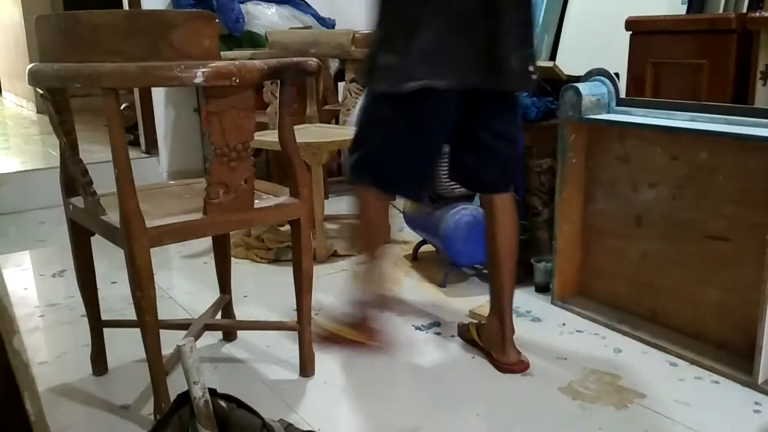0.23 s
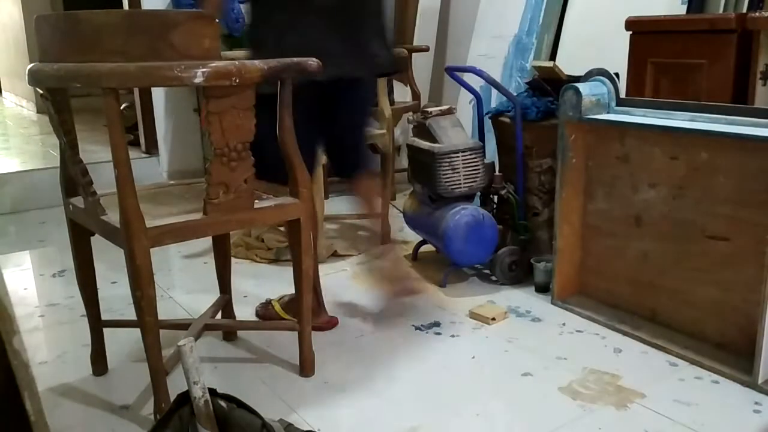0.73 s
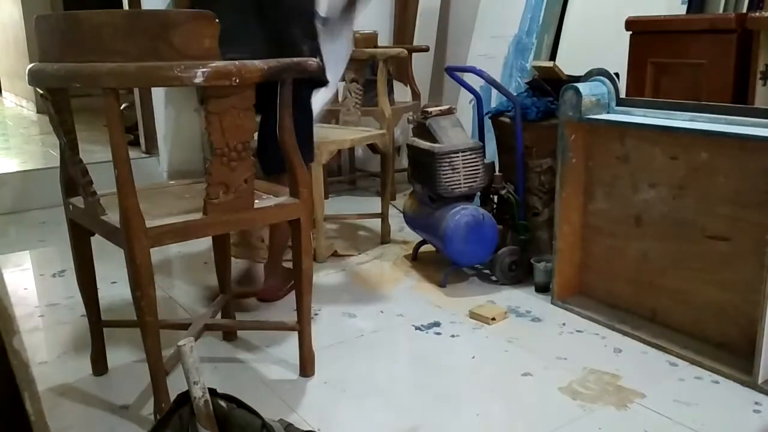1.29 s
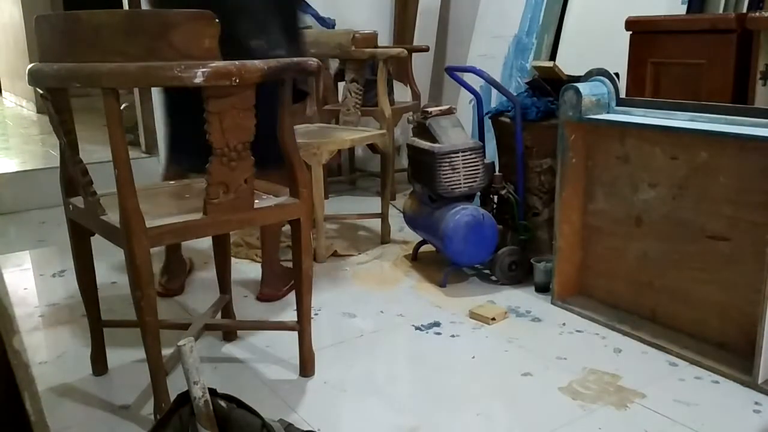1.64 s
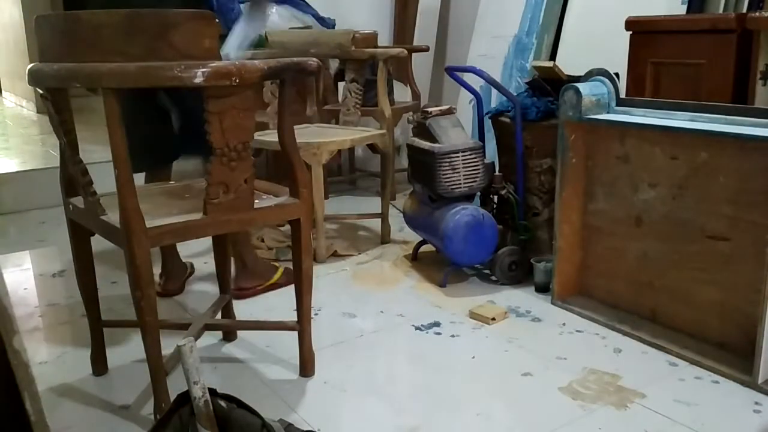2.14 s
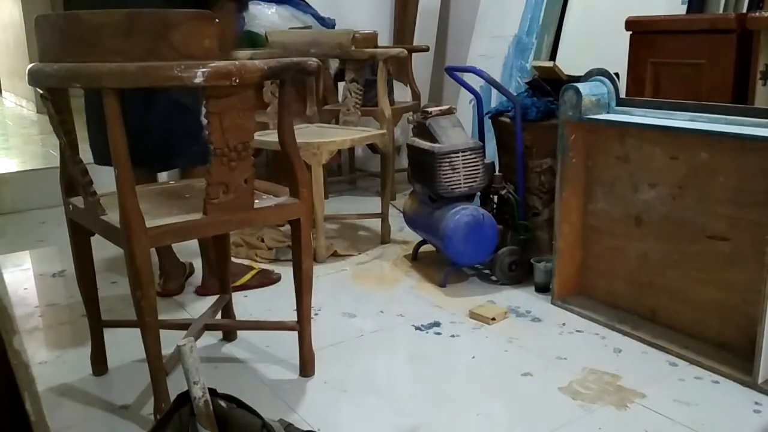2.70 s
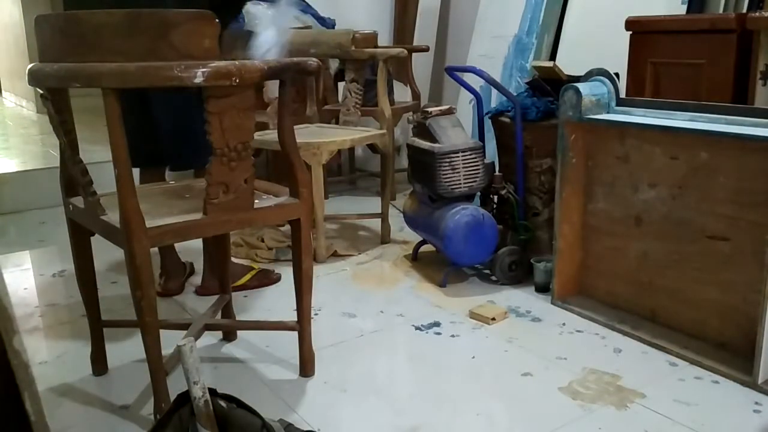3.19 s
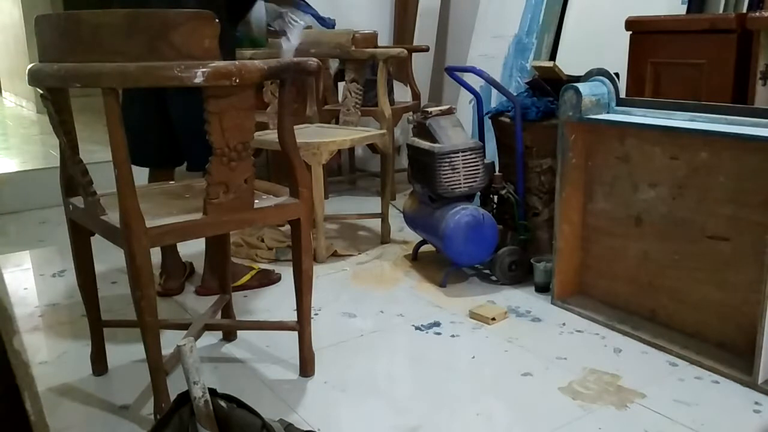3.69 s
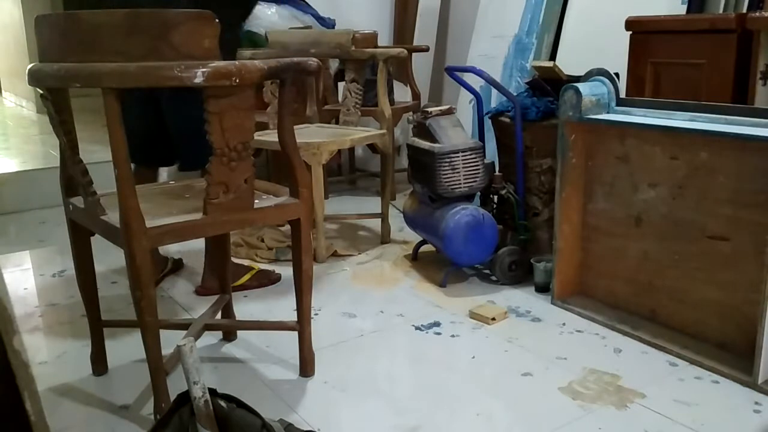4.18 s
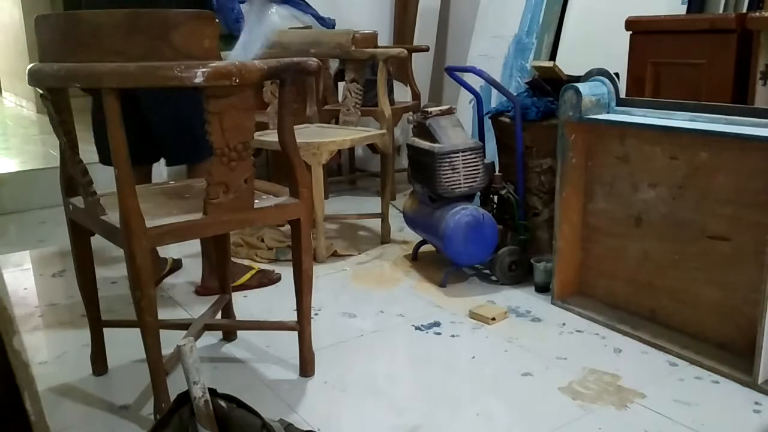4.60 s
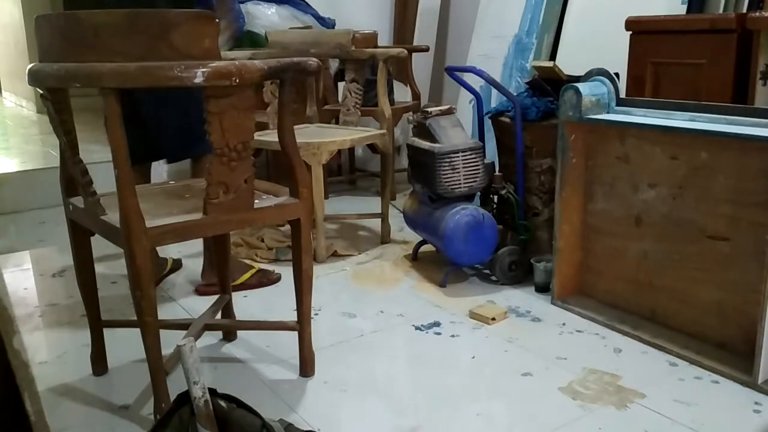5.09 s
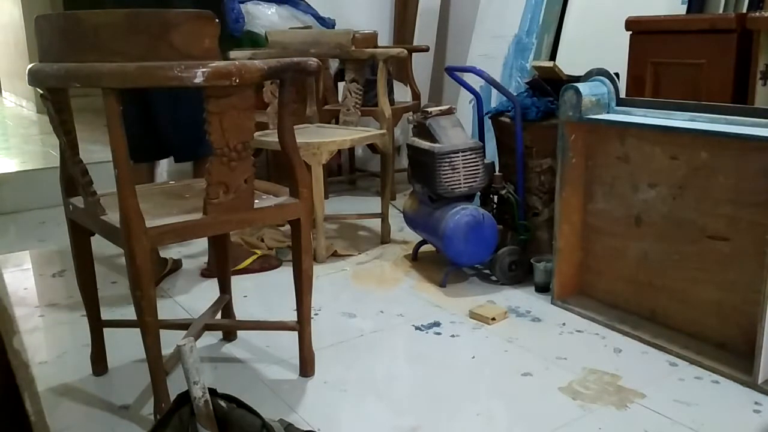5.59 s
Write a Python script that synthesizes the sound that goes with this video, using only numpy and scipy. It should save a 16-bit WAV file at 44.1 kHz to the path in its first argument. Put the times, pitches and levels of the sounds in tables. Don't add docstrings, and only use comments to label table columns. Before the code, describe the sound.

Gritty sole scuffs and tiny clicks open the scene, then three hollow flip-flop slaps, the first loudest, ring through a hard room full of wooden furniture. The walker nearly stops; only hush and a faint far motorbike remain. Then a softer slap, a quick sharp one and a dull full one. Fixed stereo microphone a few metres off, treble slightly watery from noise suppression.

```python
import sys
import numpy as np
from scipy import signal
from scipy.fft import rfft, irfft, next_fast_len
from scipy.io import wavfile
from scipy.ndimage import uniform_filter1d

SR = 44100
rng = np.random.default_rng(int(sys.argv[2]) if len(sys.argv) > 2 else 0)


def transcribe(u):
    v = np.clip(np.atleast_2d(u).T, -1, 1)
    q = np.round(v * 32767).astype(np.int16)
    wavfile.write(sys.argv[1], SR, q)


def to_linear_factor(level_db):
    exponent = np.asarray(level_db, float) / 20
    return 10 ** exponent


N = 257334

# f/Hz, level/dB
HUSH_TONE = [(12, -32), (20, -2), (128, -3.5), (652, -18), (1020, -29.5), (3720, -39.5), (4530, -45),
             (8170, -41.5), (11100, -34), (13000, -49.5), (13800, -82.5)]
# f/Hz, likeness/0-1
LIKENESS = [(50, .999), (125, .993), (250, .93), (500, .58), (1000, .03), (3000, .1), (12000, .1)]
# f/Hz, left minus right/dB
PORT_TILT = [(200, .5), (2000, 0), (4000, 1.95), (8000, -6), (12000, -4)]
# t/s, firing tone f/Hz, level/dB, third partial strength/0-1
BIKE_RIDE = [(2.85, 140, -103, 0), (3.01, 133, -74.5, 0.05), (3.189, 147.7, -66, 0),
             (3.24, 179.7, -68, 0.28), (3.451, 193.8, -68, 0.62), (3.58, 204, -70.5, .3),
             (3.67, 205.3, -72.5, 1.06), (3.76, 207, -70, 0.14), (4.08, 226, -74, 0.47),
             (4.14, 220.4, -72, 0.1), (4.172, 202.3, -59.5, 0.64), (4.28, 198.4, -63, 0.88),
             (4.7, 198, -64, 0.25), (4.885, 199, -64.5, 0.75), (5.239, 193, -73.5, .4),
             (5.35, 188, -57, 0.23), (5.5, 187.5, -71.5, 0.12), (5.579, 190, -57, 0.57)]
# f/Hz, width/Hz, level/dB
TANK_MODES = [
    (516, 60, -7),
    (765, 64, 0.5),
    (1032, 44, 1.5),
]
# peak t/s, rise/s, fall/s, second mode level/dB, third mode level/dB
TANK_SWELLS = [(.466, 0.13, 0.15, -77, -68.5), (.7, 0.041, 0.083, -69, -79), (.88, 0.043, 0.038, -94, -71),
               (1.38, 0.43, 0.15, -67, -63), (1.62, 0.066, 0.066, -62.5, -72),
               (2.0, 0.21, 0.16, -55, -54.5), (2.15, 0.26, 0.078, -56, -59),
               (2.43, 0.063, 0.51, -69.5, -69), (3.1, 0.045, 0.087, -68, -89),
               (3.15, 0.13, 0.14, -81, -68.5), (3.41, 0.11, 0.2, -72, -75.5),
               (3.54, 0.19, 0.084, -70.5, -88)]
# t/s, length/s, f/Hz, width/Hz, level/dB
NOISE_MURMURS = [(0., .11, 1950, 900, -67), (5.525, .075, 3750, 300, -82), (2.07, .15, 780, 300, -63),
                 (2.98, .45, 215, 90, -69), (.3, .35, 135, 50, -66), (1.0, .36, 150, 40, -58),
                 (1.53, .14, 800, 700, -68), (.63, .22, 900, 500, -73), (5.562, .06, 1200, 1400, -64),
                 (2.47, .11, 1035, 40, -66), (2.0, .14, 230, 120, -56), (5.2, .3, 1100, 600, -73),
                 (5.3, .2, 780, 280, -79)]
# f/Hz, level/dB per Hz
GRIT_TONE = [(1470, -51), (2500, -15), (2810, -15.5), (4740, -18), (5680, -12), (7260, -14), (11500, -3.5),
             (15500, -9), (16500, -14.5)]
# peak t/s, rise/s, fall/s, hiss level/dB, rub level/dB
SOLE_SCUFFS = [(0.0, 0.14, 0.071, -67, -74), (.225, 0.018, 0.17, -56, -71), (.26, 0.041, 0.16, -50.5, -78),
               (.36, .04, 0.22, -51, -64.5), (.46, 0.15, 0.11, -74, -66), (.545, 0.051, 0.07, -75, -65.5),
               (.878, 0.015, .2, -59, -68), (.925, 0.056, 0.034, -46.5, -49), (1.2, 0.29, 0.32, -61.5, -52),
               (1.36, 0.18, 0.14, -56, -65), (1.685, 0.023, 0.33, -56, -54.5),
               (1.752, 0.097, 0.029, -51.5, -49), (2.096, 0.22, 0.16, -59, -53),
               (2.21, 0.17, 0.12, -63.5, -67.5), (2.425, 0.066, 0.7, -64.5, -65.5),
               (2.476, 0.073, 0.071, -51.5, -62.5), (2.8, 0.18, 0.08, -55.5, -62),
               (3.164, 0.13, 0.17, -85.5, -69), (3.45, 0.1, 0.25, -85.5, -69.5),
               (3.85, 0.17, 0.13, -81.5, -92), (4.116, 0.041, 0.11, -81.5, -101),
               (4.285, 0.053, 0.028, -76.5, -61.5), (4.55, 0.087, 0.079, -74, -58),
               (4.9, 0.012, 0.034, -47.5, -44.5), (5.468, 0.047, 0.089, -65, -75),
               (5.595, 0.047, 0.023, -70.5, -65)]
# peak t/s, rise/s, fall/s, thud level/dB, floor rumble level/dB
FOOT_PRESSES = [(.226, 0.044, 0.058, -65, -68), (.44, 0.23, 0.034, -71, -76),
                (.925, 0.049, 0.036, -42, -34), (1.2, 0.1, 0.14, -45.5, -73),
                (1.4, 0.088, 0.05, -75, -61.5), (1.63, 0.056, 0.18, -66, -76),
                (1.752, 0.054, 0.051, -38.5, -29.5), (1.93, 0.14, 0.05, -59, -32.5),
                (2.08, 0.46, 0.061, -54.5, -61.5), (2.42, 0.2, 0.21, -73, -83),
                (2.565, 0.069, 0.073, -59.5, -44.5), (3.1, 0.11, 0.13, -77, -74),
                (3.43, 0.11, 0.33, -68, -75.5), (4.2, 0.17, 0.11, -72.5, -80),
                (4.285, 0.046, .03, -56, -50.5), (4.55, 0.12, 0.14, -64.5, -47.5),
                (4.9, 0.033, 0.051, -46, -34), (5.2, 0.12, 0.16, -76.5, -56), (5.35, 0.4, 0.5, -82, -54),
                (5.595, 0.044, .03, -57, -37.5)]
# t/s, peak level/dB, body level/dB, decay/s
GRIT_TICKS = [(.203, -51, -13, .003), (0.2475, -31, -40, 0.013), (0.251, -34, -42, 0.00033),
              (0.342, -29.5, -13, 0.00027), (.3525, -33, -30, 0.00075), (0.542, -38, -46, 0.0022),
              (0.543, -47, -40, .001), (0.938, -25, -12, 0.0035), (1.765, -36, -13, .005),
              (4.887, -41, 8.5, 0.0018), (5.579, -64, 10.5, 0.0047), (5.604, -31, -25, 0.00066),
              (5.624, -23, -5, 0.0026)]
# t/s, peak level/dB, f/Hz
AIR_PUFFS = [(0.9366, -22.5, 200), (.9488, -22, 600), (.9522, -19, 795), (.9578, -19, 600),
             (0.9714, -20, 453), (0.978, -27, 350), (1.7631, -22, 120), (1.7671, -18.5, 330),
             (1.7834, -22, 304), (2.581, -21.5, 250), (2.609, -21, 399.7), (4.2951, -30, 705),
             (4.3069, -21, 130), (4.3201, -30, 297.5), (4.8894, -46, 502), (4.9097, -23.5, 296),
             (4.9108, -32, 900), (5.605, -14.5, 392), (5.6063, -17.5, 905), (5.6208, -22, 400),
             (5.6324, -17.5, 348)]
# t/s, peak level/dB, treble level/dB, contact/s, body level/dB
SOLE_SLAPS = [
    (.929, -13, -8.5, 0.015, -0.5),
    (1.757, -19, -8.5, 0.0055, 0.5),
    (2.577, -17, -5, 0.0063, -1),
    (4.295, -23, -6, 0.0075, -4),
    (4.908, -19.5, -9.5, 0.0033, 0.5),
    (5.604, -17.5, -10.5, 0.0083, 3),
]
# f/Hz, level/dB
SLAP_TONE = [(25, -6), (58, -1.5), (150, -6.5), (240, -6), (500, -9), (700, -9), (1100, -13.5), (2150, -19),
             (2900, -28), (4000, -34.5), (5200, -40), (8000, -37.5), (10600, -29), (15300, -35),
             (16500, -60.5)]
# f/Hz, t60/s
ROOM_ECHO = [(60, 0.59), (250, 0.69), (1000, 0.7), (4000, 0.67), (12000, 0.43)]
# left minus right/dB, extra left lag/ms, treble echo stretch, bass echo stretch,
# crack share
SLAP_PLACES = [(.6, .2, 1.15, 0.97, 0.5), (0.9, .1, 1.08, 1.04, .1), (-0.2, .03, 1, 0.97, 0.76),
               (0.5, -.15, 1.02, 1.06, 0.86), (1.1, -.1, 0.99, 1.056, 1.35), (0.5, -.1, 1.22, 0.99, 0.74)]
# t/s, peak level/dB, f/Hz, t60/s, bass level of the slap/dB
ROOM_BOOMS = [(0.932, -15, 56.5, 0.5, -7.5), (1.753, -20, 56.2, 0.39, 0.5),
              (2.582, -34.5, 48.6, 0.34, -2.5), (4.292, -18.5, 75.6, 0.54, 2), (4.907, -29.5, 52.3, 1, 0),
              (5.597, -19.5, 61.8, 0.64, 6)]
# peak level/dB, f/Hz, t60/s, twin mode f/Hz, twin share
SEAT_RINGS = [(-12, 212, 0.48, 160, 0.15), (-24.5, 230, 0.32, 365.4, 0.79), (-19.5, 230, 0.45, 240, 0.83),
              (-31, 280, 0.42, 59, 0.46), (-32, 220, 0.54, 170, 0.53), (-26.5, 240, 0.63, 293.3, 0.67)]
PANEL_RINGS = [(-26.5, 566, 0.42, 400, 0.63), (-45, 250, 0.22, 2100, 1), (-26.5, 465, 0.46, 690, 1.1),
               (-46.5, 700, 0.39, 605, 3.4), (-32, 393.6, 0.42, 570, 0.78), (-38, 440, 1, 620, 0.7)]
FRAME_RINGS = [(-26.5, 355, 0.15, 560, 0.36), (-40, 610, 0.54, 974, .4), (-34, 1900, 0.2, 340, .8),
               (-37.5, 484, 0.52, 549, 0.7), (-33.5, 260, 0.32, 1100, 0.32), (-37, 371, 1, 640, 0.66)]
SLAT_RINGS = [(-34.5, 1001, 0.56, 2164, .7), (-39, 1480, .34, 2143, 0.96), (-37, 2100, 0.23, 1739, 0.44),
              (-37.5, 1206, 0.37, 2180, 0.5), (-36, 1136, 0.22, 2400, .6), (-47, 1100, 0.91, 2400, .5)]
HOLLOW_KNOCKS = [(-28, 1174, .25, 290, 1.5), (-31.5, 1125, 0.26, 1200, 0.77), (-18.5, 255, 0.2, 740, .5),
                 (-33, 759, 0.26, 130, 1.1), (-39, 520, 0.25, 603, 0.93), (-35.5, 673, 0.26, 160, 1.2)]


def table(rows, hz):
    f, v = np.transpose(rows)
    return np.interp(np.log(np.maximum(hz, 1)), np.log(f), v)


def unit(x):
    return x / np.sqrt(np.mean(x ** 2))


def band(x, lo_hz, hi_hz):
    return signal.sosfilt(signal.butter(3, [lo_hz, hi_hz], "band", fs=SR, output="sos"), x)


def diffuse(size, colour):
    hz = np.arange(size // 2 + 1) * SR / size
    mid, side = rfft(rng.standard_normal((2, size)))
    alike = np.clip(table(LIKENESS, hz), 0, 1)
    ports = to_linear_factor(np.outer([.5, -.5], table(PORT_TILT, hz)))
    both = np.sqrt(1 + alike) * mid + np.outer([1, -1], np.sqrt(1 - alike) * side)
    return hz, both * ports * to_linear_factor(table(colour, hz))


def diffuse_noise(colour):
    size = next_fast_len(N)
    return irfft(diffuse(size, colour)[1], size)[:, :N]


def walk(rate_hz):
    hold = int(SR / rate_hz)
    levels = np.repeat(rng.standard_normal(N // hold + 1), hold)
    return unit(uniform_filter1d(uniform_filter1d(levels, hold), hold)[:N])


def add(out, s, x):
    i = int(s * SR)
    out[:, i:i + x.shape[1]] += x[:, :N - i]


def pan(db):
    return to_linear_factor(np.array([[db], [-db]]) / 2)


def swells(rows):
    sink_db, roundness = 20, 1.2
    t = np.arange(N) / SR
    power = np.zeros((2, N))
    for s, rise_s, fall_s, *levels_db in rows:
        away = np.where(t < s, (s - t) / max(rise_s, .01), (t - s) / max(fall_s, .01))
        fade = to_linear_factor(-2 * sink_db * np.minimum(away, 5) ** roundness)
        power += np.outer(to_linear_factor(np.array(levels_db)) ** 2, fade)
    return np.sqrt(power)


def hush():
    return to_linear_factor(-69 + 1.3 * walk(8.6)) * unit(diffuse_noise(HUSH_TONE))


def bike():
    waver = 1 + 0.016 * walk(30)
    lope_hz = 11 * (1 + .2 * walk(6))
    throb = to_linear_factor(3 * walk(32) + 5 * np.sin(2 * np.pi * np.cumsum(lope_hz) / SR))
    flutter = to_linear_factor(3 * walk(22))
    s, *controls = np.transpose(BIKE_RIDE)
    hz, db, third_share = (np.interp(np.arange(N) / SR, s, c) for c in controls)
    phase = 2 * np.pi * np.cumsum(hz * waver) / SR
    first = throb * (np.sin(phase) + 0.053 * np.sin(2 * phase + np.array([[0], [1.]])))
    third_db = -24.5 + 32.5 * third_share
    third = to_linear_factor(third_db) * flutter * np.sin(3 * phase + np.array([[0], [.8]]))
    running = np.arange(N) > s[0] * SR
    return np.sqrt(2) * to_linear_factor(db) * running * (first + third)


def tank():
    modes = []
    for hz, width_hz, db in TANK_MODES:
        noise = rng.standard_normal((2, N))
        modes.append(to_linear_factor(db) * unit(band(noise, hz - width_hz / 2, hz + width_hz / 2)))
    low, second, third = modes
    second_gain, third_gain = swells(TANK_SWELLS)
    return second_gain * (low + second) + third_gain * third


def murmurs():
    out = np.zeros((2, N))
    for s, length_s, hz, width_hz, db in NOISE_MURMURS:
        noise = irfft(diffuse(24576, [(100, 0), (4000, 0.016)])[1])
        song = unit(band(noise, hz - width_hz / 2, hz + width_hz / 2))
        u = np.arange(song.shape[1]) / SR / length_s
        rise = np.clip(8 * u + (s == 0), 0, 1)
        add(out, s, to_linear_factor(db) * song * rise * np.clip(2 - 2 * u, 0, 1))
    return out


def drag():
    hiss, rub = swells(SOLE_SCUFFS)
    thud, rumble = swells(FOOT_PRESSES)
    grains = to_linear_factor(1.5 * walk(300) + .3 * walk(40))
    grit = unit(diffuse_noise(GRIT_TONE) * grains)
    flat = diffuse_noise([(100, -2.5), (4000, -19.0)])
    scrub = to_linear_factor(1.2 * walk(60))
    rubber = rub * unit(band(flat, 890, 2700)) + thud * unit(band(flat, 350, 760))
    floor = (rumble + to_linear_factor(-80.5)) * unit(band(flat.mean(0), 15, 110))
    return hiss * grit * pan(-6) + rubber * scrub + floor


def ticks(size=8192):
    out, t = np.zeros((2, N)), np.arange(size) / SR
    for s, db, body_db, decay_s in GRIT_TICKS:
        shape = np.exp(-t / max(decay_s, .0002)) + .03 * np.exp(-t / 0.031)
        grit = irfft(diffuse(size, GRIT_TONE)[1], size)
        snap = shape * signal.lfilter([1, -1], 1, grit)
        body = shape * band(rng.standard_normal(size), 900, 3000)
        click = snap / abs(snap.mean(0)).max() + to_linear_factor(body_db) * body / abs(body).max()
        add(out, s, to_linear_factor(db) * click)
    return out


def puffs():
    out = np.zeros((2, N))
    for s, db, hz in AIR_PUFFS:
        u = np.linspace(-3, 3, int(1.6 * SR / hz))
        swing = -1.65 * u * np.exp(-u ** 2 / 2)
        add(out, s - .8 / hz, to_linear_factor(db) * np.outer([1, 1], swing))
    return out


def ring(hz, t60, rise_s, twin_hz, twin, size=32768):
    t = np.arange(size) / SR
    apart = np.array([[.65], [-.65]])
    main = np.sin(2 * np.pi * hz * t + apart * min(hz / 800, 1) ** 2)
    other = np.sin(2 * np.pi * twin_hz * t - apart * min(twin_hz / 800, 1) ** 2)
    return (main - twin * other) * (1 - np.exp(-t / rise_s)) * to_linear_factor(-60 * t / max(t60, .05))


def slap(treble_db, bass_db, contact_s, body_db, treble_stretch, bass_stretch, crack, size=28672):
    t = np.arange(size) / SR
    hz, noise = diffuse(size, SLAP_TONE)
    octave = np.log2(np.maximum(hz, 1) / 30)
    colour_db = treble_db * np.clip(octave - 6.4, 0, 1)
    colour_db += bass_db * np.clip(3 - octave, 0, 1)
    colour_db += body_db * np.clip(1.6 - abs(octave - 4), 0, 1)
    modes_db = 1.8 * unit(uniform_filter1d(rng.standard_normal(len(hz)), size=24))
    noise = noise * to_linear_factor(colour_db + modes_db)
    burst = crack * np.exp(-t / 0.0014) * min(0.011 / contact_s, 1) ** 2
    out = 0
    for k in range(10):
        centre_hz = 30 * 2 ** k
        share = np.clip(1 - abs(octave - k), 0, 1)
        patches_db = 1.8 * np.interp(t, np.linspace(0, t[-1], num=40), rng.standard_normal(40))
        stretch = treble_stretch if k > 6 else bass_stretch
        fade = to_linear_factor(-60 * t / table(ROOM_ECHO, centre_hz) / stretch - 67 * t ** 2 + patches_db)
        build = 1 - np.exp(-t / (max(contact_s, .0005) + 0.046 / centre_hz))
        out = out + irfft(noise * share, size) * fade * (build + burst)
    out = out * np.clip(size / SR - t, 0, .1) * 10
    return out / np.sqrt(np.mean(band(out.mean(0), 370, 2700)[:4000] ** 2))


def steps():
    out = np.zeros((2, N))
    wood_lags_s = [.013, .005, .005, .003, .013]
    wood_rows = zip(SEAT_RINGS, PANEL_RINGS, FRAME_RINGS, SLAT_RINGS, HOLLOW_KNOCKS)
    for hit, boom, place, woods in zip(SOLE_SLAPS, ROOM_BOOMS, SLAP_PLACES, wood_rows):
        s, db, treble_db, contact_s, body_db = hit
        boom_s, boom_db, boom_hz, boom_t60, bass_db = boom
        pan_db, lag_ms, *echo = place
        step = np.zeros((2, N))
        add(step, s, to_linear_factor(db - 14) * slap(treble_db + 14.5, bass_db, contact_s, body_db, *echo))
        add(step, boom_s, to_linear_factor(boom_db - 5.5) * ring(boom_hz, boom_t60, 0.0063, .88 * boom_hz, 0.35))
        for lag_s, (wood_db, hz, t60, twin_hz, twin) in zip(wood_lags_s, woods):
            add(step, s + lag_s, to_linear_factor(wood_db) * ring(hz, t60, 0.007, twin_hz, twin))
        step[0] = np.roll(step[0], int(lag_ms * SR / 1000))
        out += step * pan(pan_db)
    return out


def scene():
    return hush() + bike() + tank() + murmurs() + drag() + ticks() + puffs() + steps()


def suppress(x, depth, from_hz, size=1024):
    shut_hz, shut_db = 12800, -105
    hz, _, bins = signal.stft(x, SR, nperseg=size)
    power = abs(bins) ** 2 + 1e-20
    near = uniform_filter1d(power, size=21, axis=1)
    local = uniform_filter1d(uniform_filter1d(power, size=3, axis=1), size=2, axis=2)
    gain = (local / near) ** (depth * np.clip(hz / from_hz - 1, 0, 1)[:, None])
    gain *= np.sqrt(near / uniform_filter1d(power * gain ** 2, size=21, axis=1))
    gain *= np.where(hz[:, None] > shut_hz, (near / (near + to_linear_factor(2 * shut_db))) ** 2, 1)
    return signal.istft(bins * gain, SR, nperseg=size)[1][:, :N]


def top_cut(x):
    return signal.sosfilt(signal.butter(12, 16660, fs=SR, output="sos"), x)


def record(dry):
    left_lag = 8
    mix = np.array([np.roll(dry[0], left_lag), dry[1]])
    mix = suppress(mix, depth=.78, from_hz=1400)
    mix = signal.sosfilt(signal.ellip(8, .2, 70, 15850, fs=SR, output="sos"), mix)
    mix[:, int(5.836 * SR):] = 0
    return top_cut(mix)


dry = scene()
out = record(dry)
transcribe(out)
```